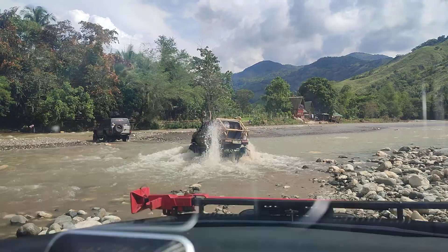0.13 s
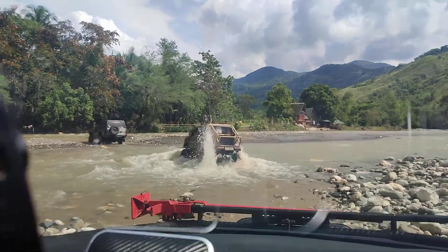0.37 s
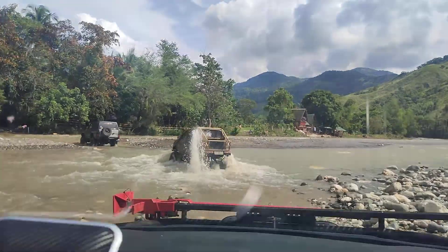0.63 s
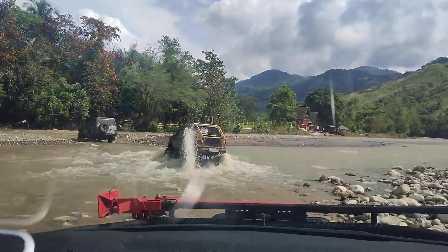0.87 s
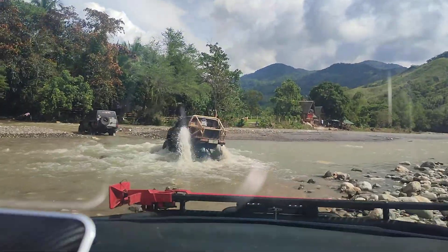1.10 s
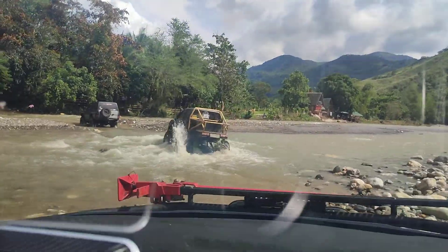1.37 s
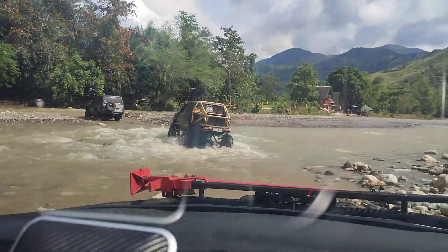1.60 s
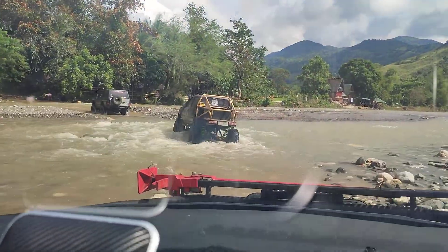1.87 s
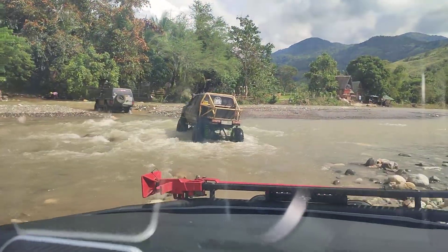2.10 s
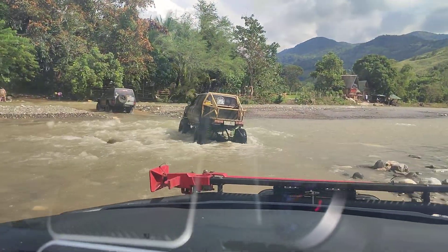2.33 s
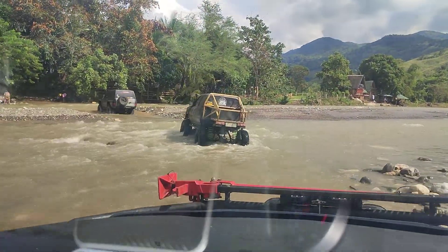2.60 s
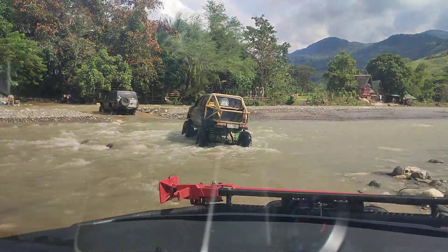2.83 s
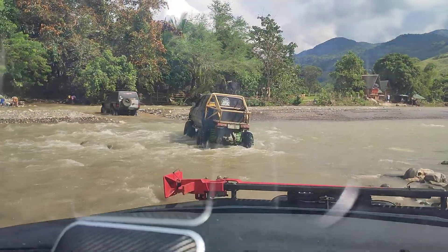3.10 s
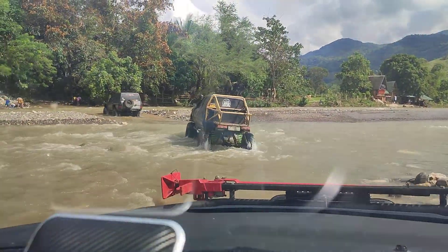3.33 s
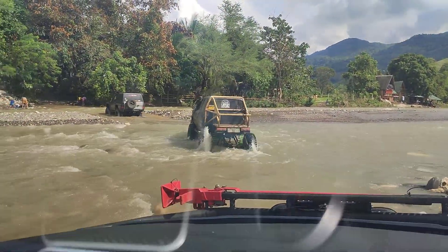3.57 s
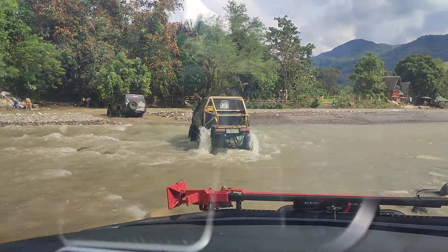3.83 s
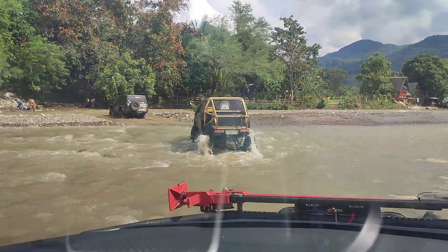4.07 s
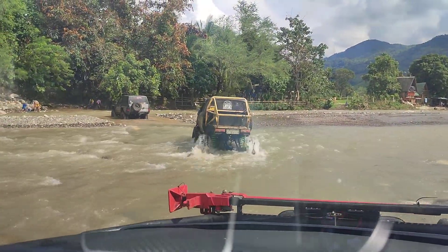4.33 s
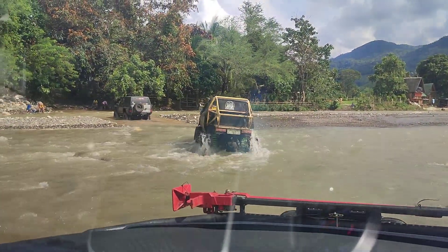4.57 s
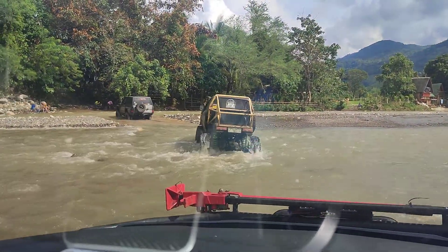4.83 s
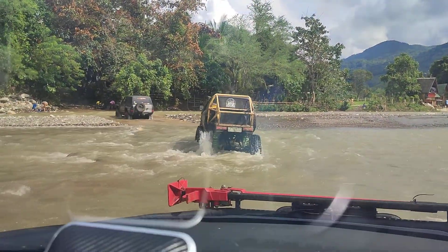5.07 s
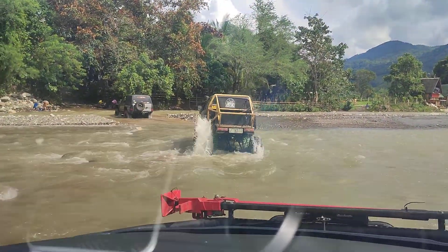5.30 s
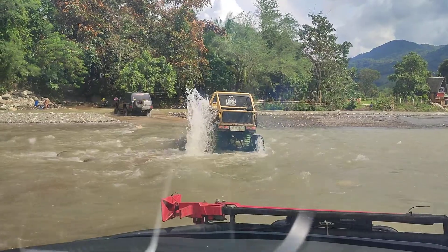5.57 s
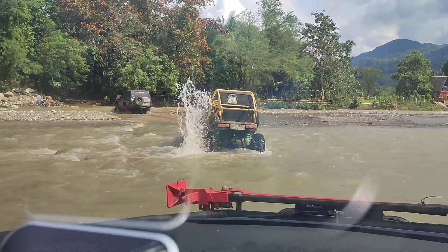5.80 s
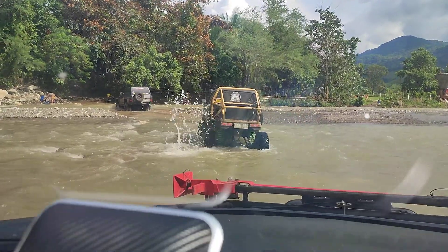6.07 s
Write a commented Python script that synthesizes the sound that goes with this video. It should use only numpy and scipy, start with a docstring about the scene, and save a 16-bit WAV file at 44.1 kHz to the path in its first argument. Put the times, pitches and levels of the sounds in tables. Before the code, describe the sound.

A stereo microphone in a small, dry vehicle cabin catches heavy low engine boom and rough body rumble, strongest at first. Small parts rattle and clink to the right during a shaken rev, then give way to rustling cloth and sharp scuffs. A thin high squeak precedes a second smoother pull that rises, holds and falls away. Idle, softer rumble and scattered knocks continue to an abrupt end.

```python
"""Inside an off-road cab rolling slowly over stones into a river. After a near-silent tenth of a second the idle's
firing harmonics boom, while a second note revs, shaken apart on the stones. Wheel hops and shaped noise rumble the
body, panels drone and valve gear clatters. Loose parts jingle as noise bursts and ringing modes, mostly on the right.
Then cloth rubs as swells of noise and a joint squeaks with an arched pitch; from 2.3 s the note pulls again, steady
in the water, then sags, a panel buzzing midway. Grainy scrapes and hard ticks recur to the end over a faint hiss."""
import sys
import numpy as np
from scipy import signal
from scipy.fft import rfft, irfft, next_fast_len
from scipy.io import wavfile
from scipy.ndimage import uniform_filter1d, map_coordinates

SR = 44100
rng = np.random.default_rng(int(sys.argv[2]) if len(sys.argv) > 2 else 0)


def store_wav(level_fs):
    """Save 16-bit WAV to argv[1]."""
    pcm = np.round(np.clip(np.atleast_2d(level_fs), -1, 1) * 32767)
    wavfile.write(sys.argv[1], SR, pcm.T.astype(np.int16))


def invert_db(level):
    """Linear amplitude ratio for a level in decibels (20 dB per decade), elementwise."""
    return 10 ** (np.asarray(level, dtype=float) / 20)


N = 272405
TIME_S = np.arange(N) / SR
PING_HZ = 6908  # shared by the thin part's pings and the ring of the shaken parts


def unit(x):
    """Scaled to rms 1."""
    return x / np.sqrt(np.mean(x ** 2) + 1e-20)


def along(points, hz):
    """Reads (freq_hz, value) points on a log frequency axis."""
    freq_hz, value = np.transpose(points)
    return np.interp(np.log(hz + 1), np.log(freq_hz + 1), value)


def curves(rows):
    """One value per sample for each column after the time."""
    time_s, *columns = np.transpose(rows)
    return [np.interp(TIME_S, time_s, column) for column in columns]


def wobble(rate_hz):
    """A smooth random curve through normal random knots, rate_hz knots a second."""
    at = np.arange(0, N + 16, 16)
    knots = rng.standard_normal(int(N * rate_hz / SR) + 4)
    return np.interp(np.arange(N), at, map_coordinates(knots, [at * rate_hz / SR]))


def during(start_s, end_s, fade_s):
    """Gate of 1 from start to end, with a linear fade on either side."""
    return np.interp(TIME_S, [start_s - fade_s, start_s, end_s, end_s + fade_s], [0, 1, 1, 0])


def swells(rows, rest_db):
    """Gain that rests low, with a bell-shaped swell at each (middle_s, half_length_s, level_db) row."""
    t = np.arange(0, N + 64, 64) / SR
    bells = sum(invert_db(db) * np.exp(-((t - middle) / half) ** 2) for middle, half, db in rows)
    return np.interp(TIME_S, t, invert_db(rest_db) + bells)


def filtered(x, response):
    """x times a complex response of frequency; the end is mirrored so that it does not click."""
    m = next_fast_len(x.shape[-1] + 8192)
    longer = np.concatenate([x, x[..., :-4096:-1]], axis=-1)
    return irfft(rfft(longer, m) * response(np.fft.rfftfreq(m, 1 / SR)), m)[..., :x.shape[-1]]


def sides(left_right_db):
    """Left and right gain of a left-right level difference."""
    return invert_db(np.array([left_right_db / 2, -left_right_db / 2]))


def tone(hz, drift):
    """A sine of rms 1 on a pitch curve, its phase wandering by drift radians."""
    return np.sqrt(2) * np.sin(2 * np.pi * np.cumsum(hz) / SR + drift * wobble(8))


# Likeness of the noise at the two ports: freq_hz [Hz], correlation [0 to 1]
PORT_LIKENESS = [(30, 0.9), (130, 0.99), (300, 0.78), (700, 0.5), (2000, 0.2), (8000, 0.033)]
# Stereo balance of the noise: freq_hz [Hz], left_right_db [dB]
NOISE_BALANCE = [(60, -1.5), (180, -0.5), (550, -0.5), (1640, 1), (4950, -1.5), (14900, 0.5)]


def rush(spectrum, patchy_db):
    """Stereo noise of rms 1 with patches of random gain, partly alike at both ports."""
    z = signal.stft(rng.standard_normal((2, N)), nperseg=512)[2]
    across_hz = uniform_filter1d(rng.standard_normal(z.shape[1:]), size=5, axis=0)
    patches = unit(uniform_filter1d(across_hz, size=8, axis=1))
    pair = signal.istft(z * invert_db(patchy_db * patches), nperseg=512)[1][:, :N]

    def mid_side(hz):
        # this split of mid and side power gives the wanted correlation
        turn = np.arccos(np.clip(along(PORT_LIKENESS, hz), 0, 1)) / 2
        return invert_db(along(spectrum, hz)) * [np.cos(turn), np.sin(turn)]

    mid, side = filtered(pair, mid_side)
    return unit(filtered(np.array([mid + side, mid - side]), lambda hz: sides(along(NOISE_BALANCE, hz))))


# Idling engine: time_s [s], firing_hz [Hz], boom_db [dB]
IDLE_NOTE = [(0.15, 21.9, -28.5), (0.6, 21.82, -24), (0.88, 22.74, -21), (1.3, 24.99, -29.5),
             (1.73, 26.05, -21), (2.0, 26.78, -25.5), (2.2, 26.94, -15.5), (2.35, 25.66, -29.5),
             (2.48, 24.78, -21), (2.77, 24.58, -17.5), (3.02, 23.99, -18), (3.29, 24.1, -23.5),
             (3.5, 23.95, -17), (4.0, 23.8, -19.5), (4.6, 24.04, -20), (5.08, 23.89, -19.5),
             (5.2, 23.88, -19.5), (5.42, 22.88, -20), (5.55, 23.17, -18.5), (6.18, 22.36, -21)]
# Its harmonics: multiple [of the firing rate], level_db [dB]
IDLE_HARMONICS = [(1, 1), (2, -22.5), (3, -20.5)]


def idle():
    """The firing rate of the idling engine pumps the whole cab."""
    firing_hz, boom_db = curves(IDLE_NOTE)
    out = np.zeros(N)
    for multiple, level_db in IDLE_HARMONICS:
        out += invert_db(boom_db + level_db + 1.3 * wobble(9)) * tone(multiple * firing_hz, drift=0.3)
    return out


# Two pulls of the revving note, stones then water: time_s [s], firing_hz [Hz], effort_db [dB]
PULLS = [
    [(0.15, 65.32, -38), (0.43, 65, -29.5), (0.56, 66.85, -38.5), (0.7, 64.57, -31.5), (1.02, 60.9, -29.5),
     (1.13, 61.2, -45), (1.25, 62.1, -31)],
    [(2.3, 52.4, -38), (2.49, 57.8, -31), (2.65, 65.5, -31.5), (2.75, 66, -31), (3.0, 65.8, -29),
     (3.4, 64.4, -29), (3.6, 61.98, -33), (3.9, 54.6, -35), (4.19, 48.22, -48), (4.41, 43.93, -33),
     (4.6, 40.8, -34.5), (4.96, 45.39, -32.5), (5.09, 43.17, -31.5), (5.22, 38.7, -43), (5.35, 37.3, -51)],
]
# Low exhaust orders: multiple [of the firing rate], level_db [dB]
LOW_EXHAUST = [(1, -1), (2, 0), (3, -2), (4, -4)]
# High exhaust orders: multiple [of the firing rate], level_db [dB]
HIGH_EXHAUST = [(6, -20), (7, -20)]
# How the cab answers low notes: freq_hz [Hz], gain_db [dB]
CAB_RESONANCE = [(40, 2), (65, -2.5), (90, -10), (112, -6.5), (130, 0.5), (155, -6), (183, -1),
                 (198, -13.5), (230, -9), (270, -18)]


def revs():
    """Exhaust orders follow the firing rate, the low ones through the cab's booms: shaken on stones, steady in water."""
    firing_hz, effort_db = curves(list(PULLS[0]) + list(PULLS[1]))
    stones = during(PULLS[0][0][0], PULLS[0][-1][0], fade_s=0.065)
    water = during(PULLS[1][0][0], PULLS[1][-1][0], fade_s=0.025)
    low, high = np.zeros(N), np.zeros(N)
    for multiple, order_db in LOW_EXHAUST:
        hz = multiple * firing_hz
        level_db = effort_db + order_db + along(CAB_RESONANCE, hz)
        shake_db = 1.4 * wobble(6.2) + 5 * stones * wobble(27.62)
        low += invert_db(level_db + shake_db) * tone(hz, drift=.15 + 1.6 * stones)
    for multiple, order_db in HIGH_EXHAUST:
        high += invert_db(effort_db + order_db + 2.7 * wobble(9)) * tone(multiple * firing_hz, drift=0.72)
    firings = np.cumsum(firing_hz) / SR
    return (stones + water) * low + water * high, firings


# A wheel climbs a stone: middle_s [s], level_db [dB]
WHEEL_HOPS = [(0.269, -14), (0.75, -48), (1.09, -24), (1.31, -22.5), (1.69, -31), (2.01, -20),
              (2.65, -20.5), (3.44, -21.5), (3.67, -23), (4.23, -28), (4.63, -19.5), (4.98, -26),
              (5.42, -33), (5.92, -53)]


def wheel_hops():
    """The axle bounces near 11 Hz, swelling as a wheel climbs each stone."""
    rows = [(middle_s, 0.09, level_db) for middle_s, level_db in WHEEL_HOPS]
    return swells(rows, rest_db=-30.5) * tone(11 + 0.59 * wobble(3.86), drift=0.65)


# Spectrum of the frame's rumble: freq_hz [Hz], level_db [dB per Hz, relative]
RUMBLE_SPECTRUM = [(16, -5), (28, -3), (48, -5.5), (70, -5.5), (120, -10.5), (157, -15.5), (194, -16),
                   (231, -25.5), (280, -22.5), (360, -50.5), (620, -120)]


def rumble(ground_db, jolt):
    """Rough ground shakes the frame: low noise that follows the stones and the jolts."""
    return invert_db(ground_db + 3.5) * unit(invert_db(0.83 * jolt) * rush(RUMBLE_SPECTRUM, patchy_db=1.0))


# Spectrum of the droning panels: freq_hz [Hz], level_db [dB per Hz, relative]
DRONE_SPECTRUM = [(120, -47), (200, -14), (250, -8.5), (310, -8), (400, -10.5), (520, -11), (650, -15),
                  (850, -15), (950, -19.5), (1100, -24.5), (1400, -28.5), (2500, -90)]


def drone(rough_db, jolt):
    """Panels drone as middle-low noise that takes on a share of the ground's swings."""
    flutter = invert_db(0.3 * jolt + 0.17 * wobble(60))
    return invert_db(-38.5 + 0.31 * rough_db) * unit(flutter * rush(DRONE_SPECTRUM, patchy_db=1.0))


# Spectrum of the valve gear: freq_hz [Hz], level_db [dB per Hz, relative]
CLATTER_SPECTRUM = [(620, -38), (1050, -9), (1230, -19), (1430, -0.5), (1530, 1), (1650, -4), (1920, -1.5),
                    (2100, -8), (2950, -10), (3570, -13.5), (5340, -19.5), (7250, -17.5), (9000, -27.5),
                    (11700, -42), (19800, -120)]


def clatter(rough_db, jolt, firings):
    """Valve gear pulses once every two firings; its level sinks as water rises round the engine."""
    sinks_db_per_s = 0.33
    level_db = -51 + 0.18 * rough_db - sinks_db_per_s * TIME_S
    beat = invert_db(0.64 * np.cos(np.pi * firings) + 0.5 * jolt)
    return invert_db(level_db) * unit(beat * rush(CLATTER_SPECTRUM, patchy_db=1.5))


def panel_buzz(firings):
    """One panel buzzes at 1540 Hz around 3.32 s, pulsing once every two firings."""
    pulse = invert_db(5.7 * np.cos(np.pi * firings))
    return swells([(3.32, 0.16, -53.5)], rest_db=-120) * pulse * tone(np.full(N, 1540), drift=.5)


# Roughness of the ground: time_s [s], rumble_db [dB]
GROUND = [(0.3, -27), (0.74, -25.5), (0.9, -24), (1.28, -26.5), (1.72, -28.5), (2.2, -33), (2.54, -30),
          (3.36, -32.5), (4.1, -32.5), (4.91, -31.5), (5.3, -32.5), (5.44, -26.5), (5.64, -29),
          (5.85, -36.5), (6.18, -36.5)]


def body(firings):
    """The stones and their jolts drive frame, panels and valve gear together."""
    ground_db, = curves(GROUND)
    rough_db = ground_db - ground_db.mean()
    jolt = wobble(14)
    shaken = wheel_hops() + rumble(ground_db, jolt) + drone(rough_db, jolt)
    return shaken + clatter(rough_db, jolt, firings) + panel_buzz(firings)


# A loose fitting strikes: start_s [s], strength_db [dB], left_right_db [dB]
FITTING_CLINKS = [(0.633, -11, -7.5), (0.7133, -19, -11), (0.7671, -28, -14), (5.633, -32.5, -3)]
# Its ringing modes: freq_hz [Hz], level_db [dB], t60_s [s]
FITTING_MODES = [(2260, -4, .02), (2460, 0, .022), (2950, -11, .03), (6300, -22, .02)]


def clinks():
    """A loose fitting rings in a few short modes, with a small rebound 7 ms later."""
    out, t = np.zeros((2, N + SR)), np.arange(SR // 3) / SR
    attack = 1 - np.exp(-t / 0.0007)
    for start_s, strength_db, left_right_db in FITTING_CLINKS:
        for delay_s, blow_db in [(0, -5), (.007, -17)]:
            ring = np.zeros(len(t))
            for hz, level_db, t60_s in FITTING_MODES:
                ring += invert_db(level_db + rng.normal(0, 1.0) - 60 * t / t60_s) * np.sin(2 * np.pi * hz * t)
            gain = invert_db(strength_db + blow_db) * sides(left_right_db)[:, None]
            out[:, round((start_s + delay_s) * SR):][:, :len(t)] += gain * ring * attack
    return out[:, :N]


# A thin part is struck: start_s [s], strength_db [dB]
THIN_PINGS = [(0.6418, -26.5), (0.651, -34), (.81, -46.5), (5.634, -48)]


def pings():
    """A thin part on the right rings in one mode, its phase running on from blow to blow."""
    out, t = np.zeros((2, N + SR)), np.arange(SR // 3) / SR
    t60_s = .095
    for start_s, strength_db in THIN_PINGS:
        at = round(start_s * SR)
        ring = invert_db(strength_db - 60 * t / t60_s) * np.sin(2 * np.pi * PING_HZ * (t + at / SR))
        out[:, at:][:, :len(t)] += sides(-15.5)[:, None] * ring * (1 - np.exp(-t / 0.0015))
    return out[:, :N]


def squeak():
    """A joint squeaks once: a tone and its lower octave rise and fall in pitch and level."""
    start_s, length_s = 2.125, .185
    arch = np.sin(np.pi * np.clip((TIME_S - start_s) / length_s, 0, 1))
    hz = 10450 + 1680 * arch
    voice = tone(hz, drift=.2) + invert_db(-2) * tone(hz / 2, drift=.5)
    return invert_db(-68 + 4 * wobble(40)) * np.sqrt(np.abs(arch)) * voice


# Hard contacts: start_s [s], strength_db [dB], left_right_db [dB]
CONTACTS = [(0.1144, -19, -6), (.1537, -18.2, -7), (0.4365, -7.5, -8.5), (0.618, -24, -13),
            (1.357, -21, -9), (1.798, -26, 0), (1.944, -20, -8), (3.586, -30, 0), (5.188, -33, 0),
            (5.4221, -20, -1), (5.916, -34, -1)]
# Blows of one contact: delay_s [s], blow_db [dB]
CONTACT_BLOWS = [(0, 13), (.0004, 9), (.00105, 11), (.0016, 7)]
# Broad resonances of the trim: freq_hz [Hz], width_hz [Hz], level_db [dB]
TRIM_MODES = [(650, 500, -6), (1400, 1000, 0), (2900, 1200, 0), (6900, 1300, -4), (11500, 7000, -14)]


def ticks():
    """Hard contacts strike the trim's broad resonances; a strong one chatters within two milliseconds."""
    blows = np.zeros((2, N))
    for start_s, strength_db, left_right_db in CONTACTS:
        pattern = CONTACT_BLOWS if strength_db > -18 else CONTACT_BLOWS[:1]
        for k, (delay_s, blow_db) in enumerate(pattern):
            blow = (-1) ** k * invert_db(strength_db + blow_db) * sides(left_right_db)
            blows[:, round((start_s + delay_s) * SR)] -= blow

    def trim(f):
        modes = enumerate(TRIM_MODES)
        return sum((-1) ** k * invert_db(db) * 1j * f * w / (c * c - f * f + 1j * f * w) for k, (c, w, db) in modes)

    return filtered(blows, trim)


# Scrapes: start_s [s], strength_db [dB], low_db and high_db [dB against the middle part], left_right_db [dB]
SCRAPES = [(0.299, -26.5, -6, -41, -15.5), (0.6544, -30.5, -10, -33, -4), (0.7305, -37, -7, -32, -7.5),
           (1.0854, -46.5, -2, -7, 1), (1.2993, -50.5, 4, 15.5, -11.5), (1.358, -52.5, 3, 6, -16),
           (1.7162, -53.5, -6, 10.5, 7), (1.775, -41, -10.5, -4.5, 10), (1.799, -28.5, 7, -21, 2),
           (1.8152, -19, -12, -22, -2), (1.9118, -23.5, -0.5, -14, -5), (1.942, -16, -4, -18, -2),
           (1.956, -18, -13, -26, -1), (2.2647, -46, 0, -8, 3), (2.299, -39, -8, -12, 0),
           (2.9694, -42, -12, -13, 1), (3.1458, -41, 10, -19, 7), (3.38, -47.5, -5, -11, 9),
           (4.6104, -36, 0.5, -9, 4.5), (4.7867, -56, 4, 9, 2), (4.8394, -34, -1, -9, 6),
           (4.9956, -37.5, -11, -8, 4.5), (5.499, -42.5, 9, -9, -2), (5.5702, -37, 3, -33, 0),
           (5.8765, -44, 4, -31, -8)]
# Low part of a scrape: freq_hz [Hz], level_db [dB per Hz, relative]
LOW_SCRAPE = [(200, -49), (320, 7.5), (520, 8), (900, -6.5), (1400, -46)]
# Middle part: freq_hz [Hz], level_db [dB per Hz, relative]
MIDDLE_SCRAPE = [(600, 5.5), (1100, 3.5), (3200, -2.5), (5500, -9), (7500, -9.5), (9000, -32)]
# High part: freq_hz [Hz], level_db [dB per Hz, relative]
HIGH_SCRAPE = [(6500, -14), (8500, -0.5), (11000, 3), (14300, -3), (14600, -93)]


def scuffs():
    """Short scrapes: grainy noise that starts quickly, holds while the surfaces slide and stops, low part longer."""
    out, t = np.zeros((2, N + SR)), np.arange(SR // 8) / SR
    slide_s = 0.013

    def slide(life_s):
        return np.exp(-(t / life_s) ** 1.44) * (1 - np.exp(-t / 0.0016))

    def part(pair, spectrum):
        return unit(filtered(pair, lambda hz: invert_db(along(spectrum, hz))))

    for start_s, strength_db, low_db, high_db, left_right_db in SCRAPES:
        noise = rng.standard_normal((3, len(t)))
        pair = unit(noise[0] + 7.5 * noise[1:])  # a little noise in common, the rest separate
        low = invert_db(low_db) * part(pair, LOW_SCRAPE)
        upper = part(pair, MIDDLE_SCRAPE) + invert_db(high_db) * part(pair, HIGH_SCRAPE)
        grains = unit(invert_db(2.5 * np.repeat(noise[0], 70)[:len(t)]))  # level steps every 70 samples
        puff = low * slide(2.16 * slide_s) + grains * upper * slide(slide_s)
        out[:, round(start_s * SR):][:, :len(t)] += invert_db(strength_db - 5.5) * sides(left_right_db)[:, None] * puff
    return out[:, :N]


def clumps():
    """Random gain that gathers noise into clumps."""
    return invert_db(2.3 * wobble(45) + 1.5 * wobble(300))


# Loose parts thrown up: middle_s [s], half_length_s [s], level_db [dB]
PART_SHAKES = [(.3, 0.088, -53), (.41, 0.045, -55), (.62, 0.077, -51), (.93, 0.033, -53.5),
               (.99, .025, -42), (1.1, 0.031, -51), (1.2, 0.051, -53), (1.3, 0.0078, -50),
               (1.37, 0.02, -51.5)]
# Their spectrum: freq_hz [Hz], level_db [dB per Hz, relative]
PART_SPECTRUM = [(760, -5), (1300, -1.5), (1500, -0.5), (1660, -4.5), (2000, -2.5), (2790, -7),
                 (3000, -8.5), (4710, -11), (5880, -9), (6700, -5), (8530, -19.5), (11000, -12.5),
                 (14400, -19)]


def loose_parts():
    """A bunch of small parts on the right shakes as clumped noise and rings in one narrow band."""
    strikes = rng.standard_normal(N) * invert_db(5.5 * wobble(93))
    ring = unit(filtered(strikes, lambda f: 1j * f * 70 / (PING_HZ ** 2 - f * f + 1j * f * 70)))  # 70 Hz wide
    parts = unit(clumps() * rush(PART_SPECTRUM, patchy_db=0.5)) + invert_db(-19) * ring
    shaking = during(0.136, 1.41, fade_s=0.025) * swells(PART_SHAKES, rest_db=-47.5)
    return shaking * sides(-9.5)[:, None] * parts


# Cloth strokes: middle_s [s], half_length_s [s], level_db [dB]
CLOTH_STROKES = [(1.5, 0.098, -55), (1.72, .012, -53), (1.82, 0.012, -62), (1.945, 0.022, -42),
                 (2.28, 0.082, -56.5), (2.48, 0.07, -46), (2.97, 0.063, -58), (3.15, .02, -59),
                 (3.39, 0.017, -57), (3.6, 0.02016, -75), (3.79, .02, -63.5), (4.0, 0.056, -54),
                 (4.24, 0.12, -54), (4.46, .04, -56.5), (4.62, 0.032, -55), (4.845, 0.011, -46),
                 (5.01, 0.058, -47.5), (5.12, 0.025, -52), (5.52, 0.094, -62), (5.84, 0.029, -58)]
# Spectrum of the cloth: freq_hz [Hz], level_db [dB per Hz, relative]
CLOTH_SPECTRUM = [(1300, 1), (2300, -7.5), (3500, 1), (5300, -6.5), (7200, 1), (8600, -8.5), (13500, -6),
                  (14400, -22)]


def cloth():
    """Cloth rubs as clumped noise from 1.4 s on, never lying quite still between strokes."""
    rubbing = during(1.4, N / SR, fade_s=0.028) * swells(CLOTH_STROKES, rest_db=-68.5)
    return rubbing * sides(-1.5)[:, None] * unit(clumps() * rush(CLOTH_SPECTRUM, patchy_db=3.5))


# Decay of the upholstered cab: freq_hz [Hz], t60_s [s]
CAB_DECAY = [(300, 0.1), (2000, 0.035), (10000, 0.017)]


def cab(x):
    """The upholstered cab answers with a brief decaying noise tail, different at each port."""
    hz, t, z = signal.stft(rng.standard_normal((2, SR // 5)), SR, nperseg=256)
    tail = signal.istft(z * invert_db(-60 * t / along(CAB_DECAY, hz)[:, None]), SR, nperseg=256)[1]
    late = np.pad(x, ((0, 0), (90, 0)))  # 90 samples, about 2 ms
    return signal.fftconvolve(late, tail / np.linalg.norm(tail[0]), axes=1)[:, :N]


# Lateness at the left port: freq_hz [Hz], share [of the full path difference]
PORT_LATENESS = [(350, 0.31), (1200, 0.91)]


def ports(x):
    """Sound from the right reaches the left port a little later; bass fills the cab and arrives nearly together."""
    full_lag_s = 20 / SR

    def delay(hz):
        lag_s = full_lag_s * np.clip(along(PORT_LATENESS, hz), 0, 1)
        return np.exp(-2j * np.pi * hz * lag_s * np.array([[1], [0]]))

    return filtered(x, delay)


# Spectrum of the microphone hiss: freq_hz [Hz], level_db [dB per Hz, relative]
HISS_SPECTRUM = [(2940, -27), (5000, -11), (6950, 0), (7660, -4), (9460, -9), (10900, 0), (14300, 5)]


def hiss():
    """The microphones' own faint noise, strongest in the treble."""
    return invert_db(-67.5) * rush(HISS_SPECTRUM, patchy_db=2.5)


def scene():
    """Everything in the cab, as it reaches the two ports, over the faint hiss of the microphones."""
    note, firings = revs()
    engines = sides(-.45)[:, None] * (idle() + note)
    near = scuffs() + clinks() + pings() + squeak() + ticks()
    rustle = cloth() + loose_parts()
    return ports(engines + body(firings) + rustle + near + invert_db(-10.0) * cab(near)) + hiss()


def low_pass(x):
    """Removes everything above the highest recorded frequency."""
    return signal.sosfilt(signal.butter(12, 15530, fs=SR, output="sos"), x)


def record(dry):
    """The sound opens abruptly, swells to a steady -1.5 dB and fades in the last 7 ms; 14.3 kHz limits the band."""
    opening_db = np.interp(TIME_S, [.1125, .1135, .16, .22], [-120, -13, -7.0, -1.5])
    closing = np.clip((N - 1 - np.arange(N)) / (.007 * SR), 0, 1)
    mix = filtered(dry * invert_db(opening_db) * closing, lambda hz: np.where(hz < 14300, 1, invert_db(-27)))
    return low_pass(mix)


dry = scene()
out = record(dry)
store_wav(out)
```